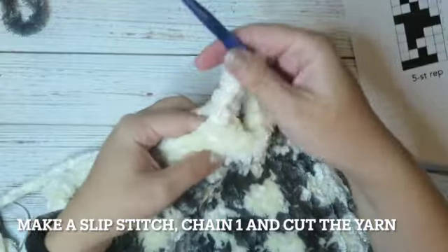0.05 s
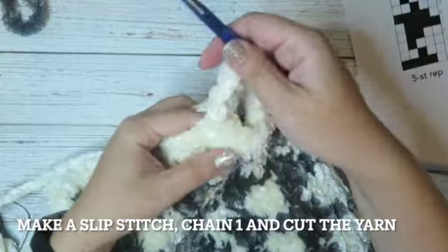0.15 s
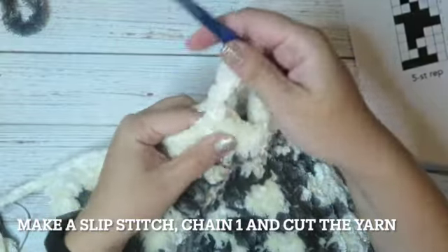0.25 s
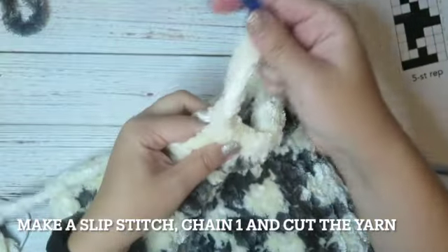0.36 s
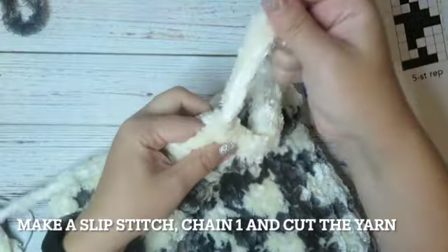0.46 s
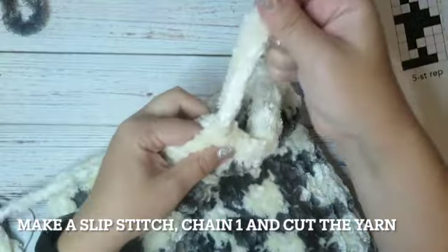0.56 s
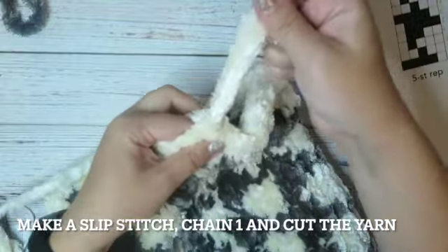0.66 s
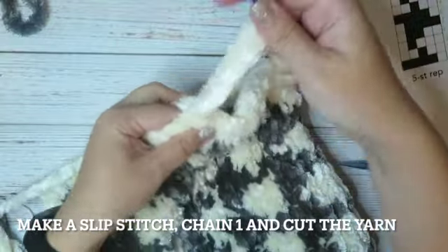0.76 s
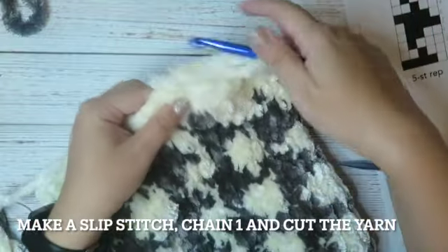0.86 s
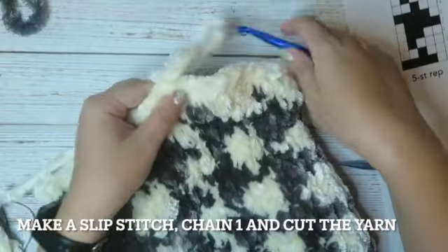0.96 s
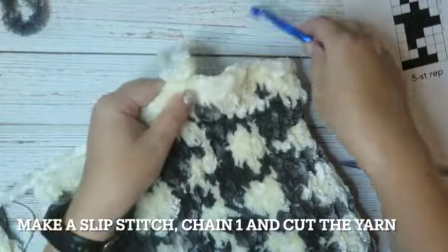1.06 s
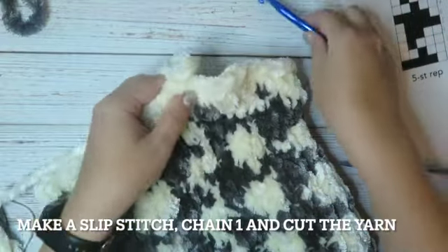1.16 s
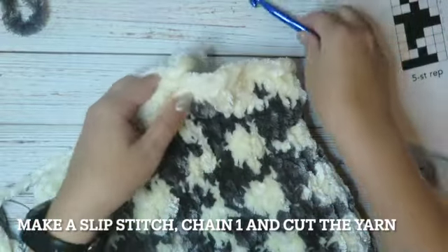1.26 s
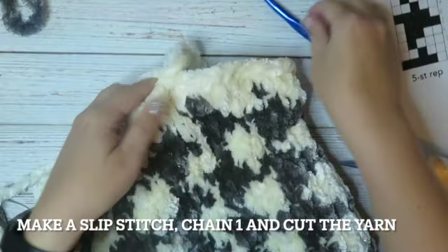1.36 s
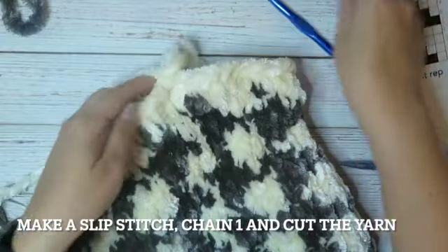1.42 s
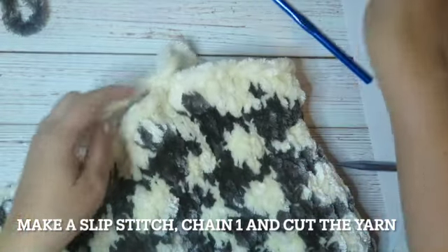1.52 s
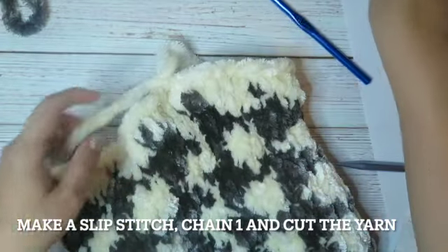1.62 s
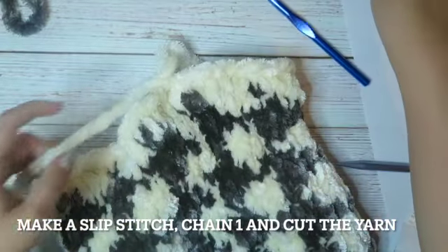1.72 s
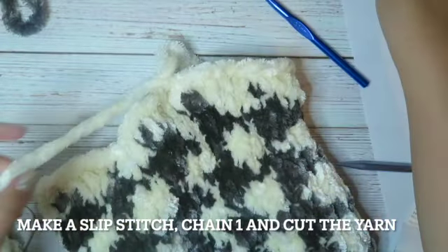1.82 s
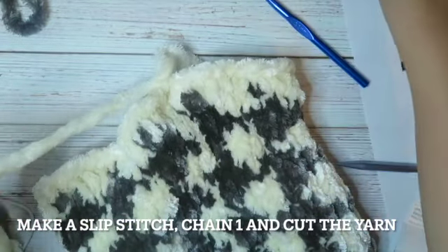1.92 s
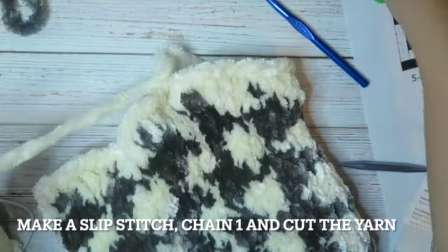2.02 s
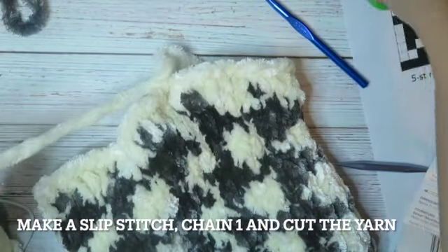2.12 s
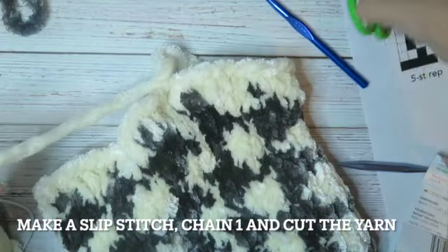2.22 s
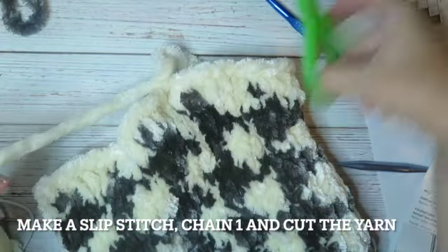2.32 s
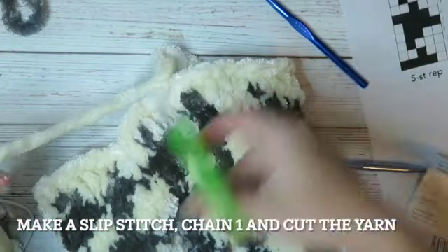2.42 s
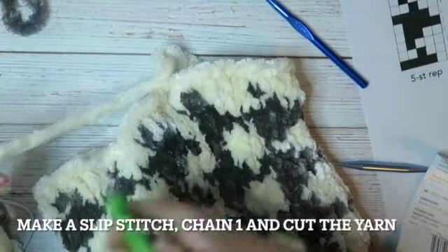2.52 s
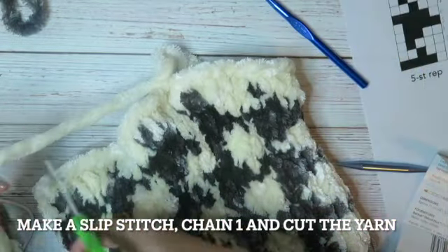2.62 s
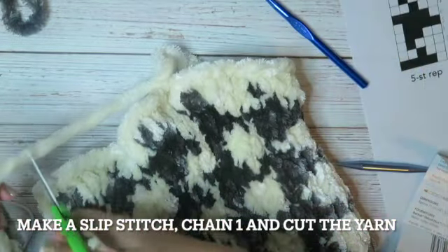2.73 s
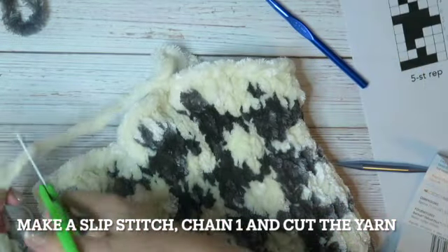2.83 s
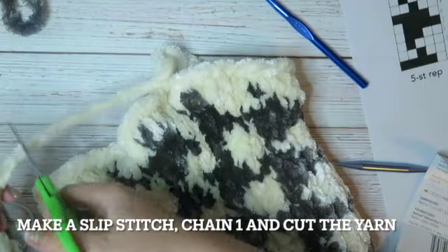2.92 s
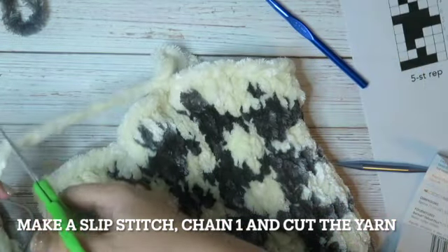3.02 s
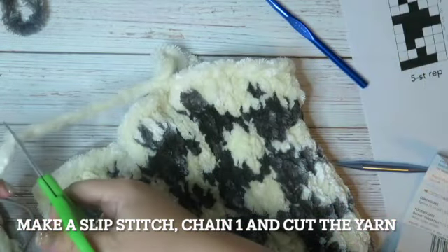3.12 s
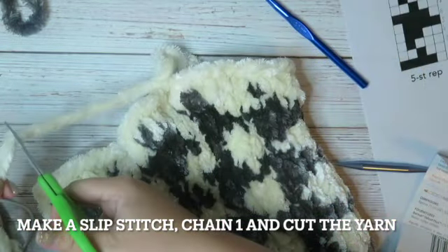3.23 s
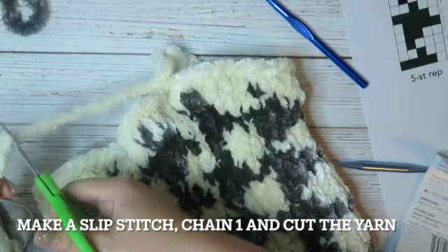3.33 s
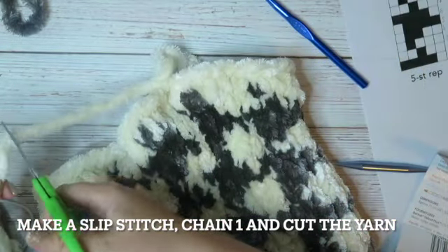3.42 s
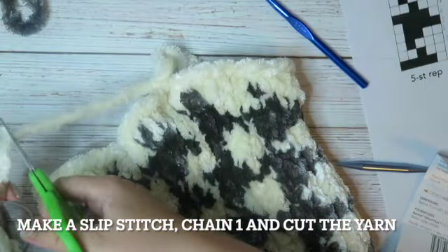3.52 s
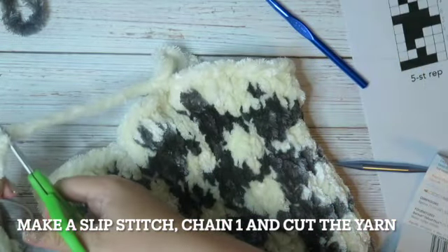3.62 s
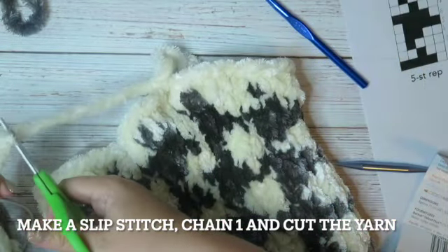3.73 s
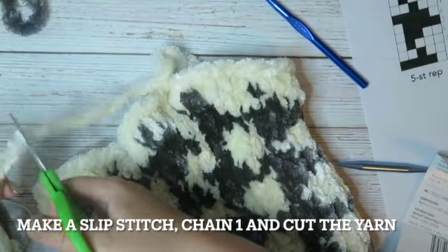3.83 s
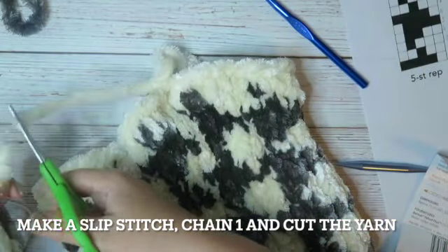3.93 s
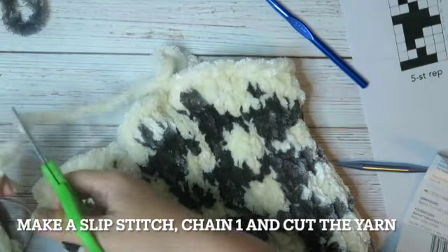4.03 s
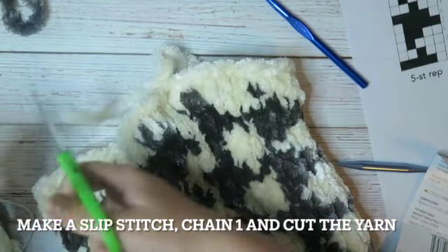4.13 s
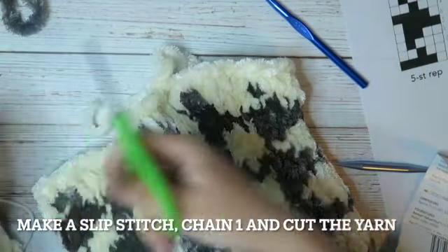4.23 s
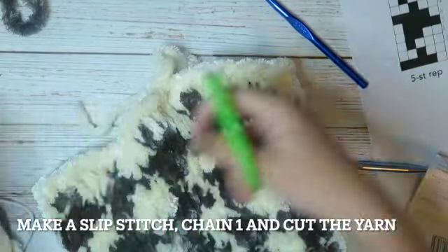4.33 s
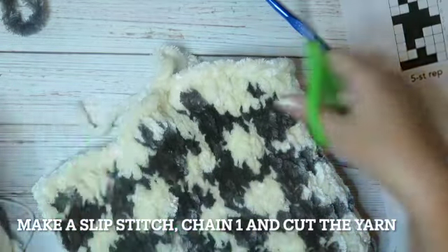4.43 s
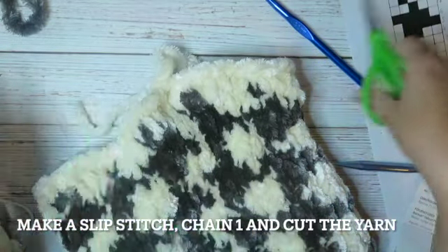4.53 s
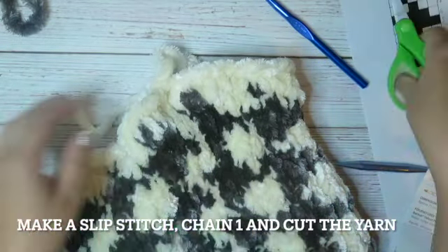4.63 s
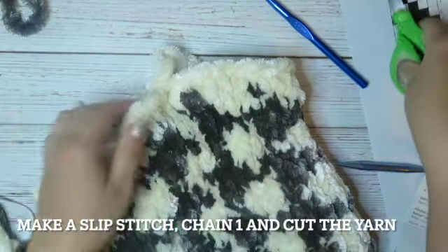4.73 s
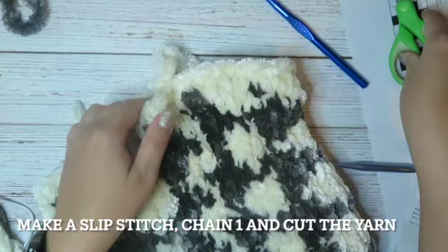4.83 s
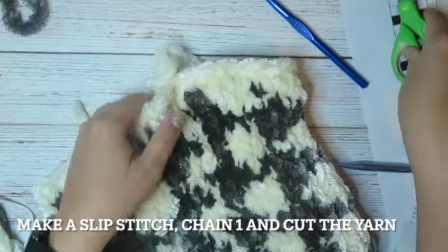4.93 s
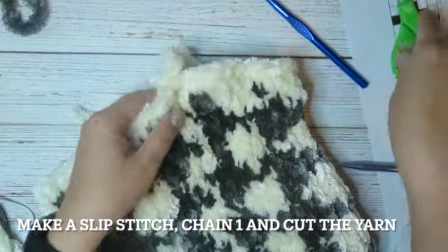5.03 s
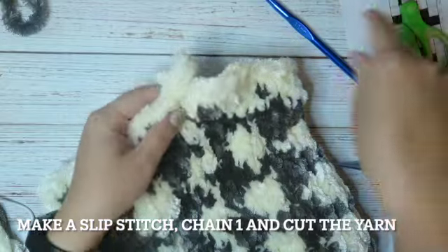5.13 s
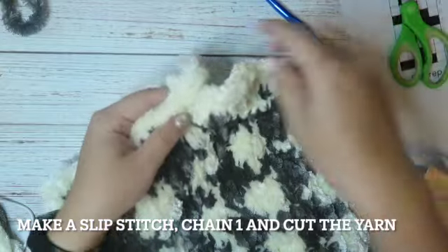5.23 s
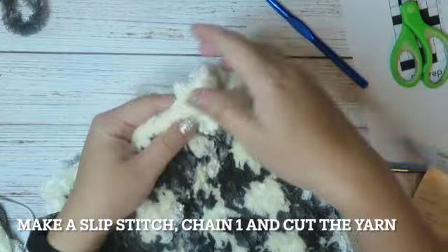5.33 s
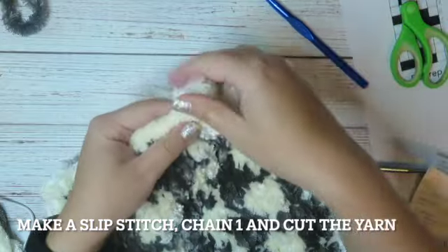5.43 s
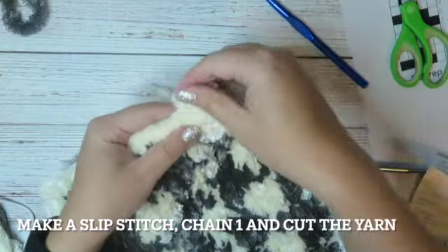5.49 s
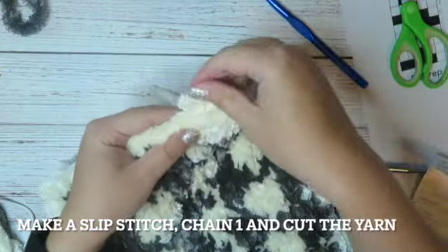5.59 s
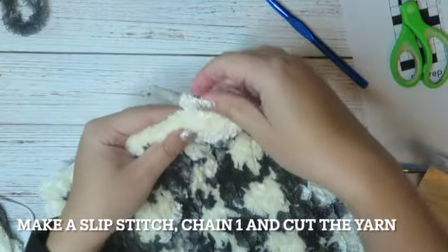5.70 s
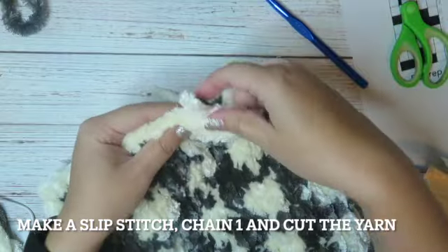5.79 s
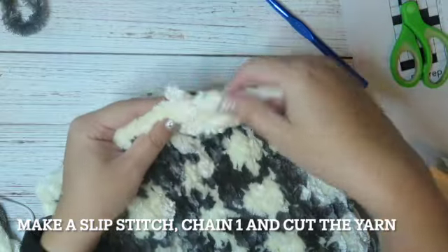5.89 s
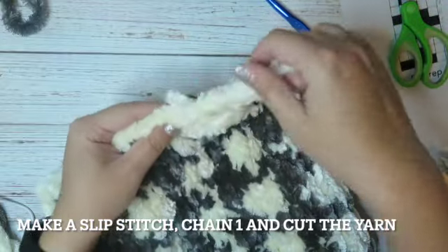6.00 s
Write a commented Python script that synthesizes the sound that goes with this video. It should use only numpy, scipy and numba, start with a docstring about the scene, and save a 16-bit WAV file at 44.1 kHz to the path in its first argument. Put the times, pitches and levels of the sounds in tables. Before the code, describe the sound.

Close stereo sound in a quiet, faintly hissing room. After a soft scuff, a crochet hook knocks down on a wooden table in a quick cluster, with scratchy sliding over paper and wool. A very sharp click ends the handling as scissors are picked up. Bright scraping snips through thick yarn follow slightly left, with crisp blade ticks. Finally the scissors drop on the right with two hard knocks and a brief rattle, then near silence.

```python
"""After a soft scuff, a crochet hook is laid on a wooden table and scissors are picked up: knocks ring the
modes of the table top, hard ticks edge the contacts, and noise of tiny catches slides over paper and wool.
Then the scissors snip thick yarn, with sharp blade ticks over swells of scraping noise.
At last they are dropped with hard knocks and a short rattle. A quiet room hisses throughout."""
import sys
import numpy as np
from scipy import signal
from scipy.fft import rfft, irfft, next_fast_len
from scipy.io import wavfile
from scipy.ndimage import uniform_filter1d
from numba import njit

SR = 44100
rng = np.random.default_rng(int(sys.argv[2]) if len(sys.argv) > 2 else 0)


def master_out(mix):
    """Clip the mix to full scale and print it as 16-bit PCM to the path in sys.argv[1]."""
    frames = np.transpose(np.atleast_2d(mix))
    ceiling = np.clip(frames, -1, 1)
    pcm = np.round(ceiling * 32767).astype(np.int16)
    wavfile.write(sys.argv[1], SR, pcm)


N = 267092

# Room hiss and far rumble. Each row: frequency in Hz, relative level in dB per Hz.
AIR_SPECTRUM = [(12, -41), (20, -10.5), (60, -0.5), (165, -8.5), (195, -8), (297, -11.5), (332, -11),
                (372, -11.5), (709, -13.5), (794, -13.5), (994, -14), (1320, -14.5), (3520, -17.5),
                (15200, -29), (16500, -44)]
# Stereo width of the air. Each row: frequency in Hz, side minus mid in dB.
AIR_SIDE_SPECTRUM = [(60, -12), (110, -1.5), (200, 7), (380, 8), (700, 4.5), (1290, -1.5), (2380, -5.5),
                     (4400, -6.5), (8120, -2.5), (15000, 0.5)]
# Scuffs of hand and tools on paper and wool. Each row: start of full level in seconds, level in dB,
# rise in ms per 20 dB, hold in ms, centre in octaves above 1 kHz, shaking of the table in dB.
SCUFFS = [(.38, -55, 60, 120, 2.9, -56), (1.309, -42, 18, 49, 1.3, -56), (1.41, -44.5, 16, 25, 2.6, -29.5),
          (1.63, -38, 26, 32, 2, -29.5), (1.752, -41.5, 37, 24, 1.5, -46.5),
          (1.845, -39.5, 38, 31, 0.74, -40.5), (1.931, -34, 5, 50, 1.83, -32.5),
          (2.04, -44, 42, 51, 2.2, -51), (2.115, -38, 25, 22, 3.1, -39.5),
          (2.178, -37, 27, 21, 1.44, -39.5), (2.289, -39.5, 8, 5, .9, -41), (2.39, -50, 24, 30, 3.8, -44),
          (2.515, -42.5, 12, 12, 3.9, -52), (2.565, -55, 17, 16, 2.7, -50),
          (4.85, -50.5, 45, 17, 1.15, -70), (4.925, -40.5, 85, 68, 1.1, -65)]
# The dropped scissors rattle to rest. Each row: start of full level in seconds, level in dB,
# rise in ms per 20 dB, hold in ms.
RATTLE_SWELLS = [(5.11, -17.5, 5, 9.5), (5.135, -41, 13, 26)]
# Tone of the rattle. Each row: frequency in Hz, relative level in dB per Hz.
RATTLE_SPECTRUM = [(290, -54), (500, -11.5), (1400, -4), (2160, -6), (2430, -1), (2610, -10), (5310, -15),
                   (9630, -28), (11800, -23.5), (16000, -29)]
# Modes of the table top. Each row: frequency in Hz, level in dB, T60 in seconds.
TABLE_MODES = [(61.7, 0.5, 0.23), (90, -4, 0.093), (134.3, -10, 0.21), (145, -2.5, 0.2), (194.5, -10, 0.2),
               (248, -11, 0.026), (276.5, 2.5, 0.031), (317, -1.5, 0.065), (330, -8, 0.078),
               (379, -11.5, 0.1), (430, -6.5, 0.18), (446, -23, 0.069), (565.4, -7.5, 0.081),
               (667, -14, 0.083), (780, -5.5, 0.035), (851, -16.5, 0.12), (960, -8, 0.037),
               (1090, -10, 0.019), (1375, -15, 0.043), (1750, -17, 0.036), (2070, -25, 0.099),
               (2537, -16, 0.04)]
# Blows on the table. Each row: start in seconds, strength in dB, contact time in ms (at most 4 is used),
# tilt over the modes in dB per octave.
TABLE_BLOWS = [(0.931, -47.5, 0.62, 3), (1.3075, -14.5, 1.4, 6.5), (1.316, -24, 0.97, 2),
               (1.342, -29.5, 1.14, 1.5), (1.3991, -25.5, 0.67, 0), (1.4096, -8, 0.77, 2.5),
               (1.4145, -14, 0.48, 2.5), (1.428, -21, 0.38, 2.5), (1.4555, -24, 1.1, 4.5),
               (1.466, -25.5, 0.57, -3), (1.551, -37, 2.3, -1), (1.607, -34, 1.4, -5.5),
               (1.6332, -17.5, 0.53, 1), (1.643, -22, 0.34, 1), (1.7703, -21.5, 1.6, 1),
               (1.849, -28, 4.3, -1), (1.926, -33, 0.81, -2), (1.975, -36.5, 2.5, -8.5),
               (2.14, -31, 1.8, -4), (2.155, -29, 0.57, 7), (2.1608, -26.5, 1.8, -1.5),
               (2.2865, -37.5, 0.21, 5), (2.3619, -27, 0.52, 5), (2.368, -24, 1.9, -2.5),
               (4.9771, -10.5, 1.32, 2), (5.0977, -11, 1.94, 5.5), (5.124, -16.5, 2.4, 1),
               (6.03, -47.5, 1.9, -5)]
# Blade strokes through yarn. Each row: start of full level in seconds, level in dB,
# rise in ms per 20 dB, hold in ms.
BLADE_STROKES = [(3.10, -40, 55, 42), (3.314, -34.5, 15, 8), (3.634, -33, 53, 23), (3.955, -35, 34, 28),
                 (4.293, -34, 22, 6)]
# Modes of scissor steel and plastic. Each row: frequency in Hz, width in Hz, level in dB.
SCISSOR_MODES = [(710, 150, 11.5), (2330, 690, 1), (3060, 2000, -5.5), (4320, 880, 5.5), (4850, 1130, -5.5),
                 (6100, 1400, -20), (11250, 2550, 4), (12500, 1100, -31)]
# Hard ticks of hook, handles and blades. Each row: start in seconds, peak level in dB before panning,
# band centre in octaves above 1 kHz (kept within 500 to 14000 Hz), decay time constant in ms.
HARD_TICKS = [(1.305, -15, 3., 1.2), (1.352, -32, 5, .8), (1.397, -25, 2, .8), (1.4092, -17.5, 2.6, 0.74),
              (1.414, -18, 2.5, .9), (1.640, -21, 1.5, 1.1), (1.660, -20, 6, .8), (1.93, -24, 5, 1.1),
              (2.002, -17.5, 3.4, 2.1), (2.1545, -20, 1., 0.87), (2.191, -26, 6, 1.5),
              (2.2848, -22, 5, 1.3), (2.3602, 1, 2, 0.94), (2.3619, -5.5, -.5, 0.72), (2.368, -21, 5, 1.),
              (2.514, -22.5, 5, 1.7), (3.3154, -7.5, 2, 0.34), (3.4948, -22, 3, 0.4), (3.619, -33, 0.5, .6),
              (3.6542, -23, 3.5, .8), (3.8377, -26.5, 2, 1.5), (3.9746, -9, 2.5, 0.47),
              (4.13, -26.5, 4, 0.95), (4.2949, -8.5, 2, 0.21), (4.976, -10, 3, 0.85), (4.984, -28, 3.3, .6),
              (4.993, -23, 3., .7), (5.108, -30, 6, .9), (5.1128, -9, -0.1, 1.), (5.118, -11, 1, 1.)]
# Early echoes of a tick off table and phone stand. Each row: delay in ms, level in dB.
TICK_ECHOES = [(2.1, -12), (3.6, -16), (7.0, -15), (10.5, -19)]

AIR_DB = -47.5  # level of the mid part
ROOM_DB, ROOM_T60_S = -16, 0.11
SLIDE_FALL_MS, SHAKE_RISE_MS, SHAKE_FALL_MS = 44, 40, 100  # per 20 dB
RATTLE_FALL_MS = 41  # per 20 dB
RADIATE_HZ = 104.5  # below this the table top barely moves the air
SHEAR_OCTAVES, SHEAR_FALL_MS = 3.3, 34  # centre above 1 kHz; fall per 20 dB
BUZZ_DB, BUZZ_MS = -25, 12  # loose parts buzz on; level and decay time constant
# the tools lie on the right; the scissors work at the yarn on the left between these times
YARN_START_S, YARN_END_S = 2.6, 4.4
YARN_PAN_DB, DESK_PAN_DB = 4, -3  # left minus right
YARN_THIN_HZ = 1480  # held in the air, the blades give little below this
TOP_HZ = 15900  # top edge of the phone's range


def undb(db):
    """Turn decibels into an amplitude factor."""
    return 10 ** (np.asarray(db) / 20)


def unit(x):
    """Scale to an RMS level of one."""
    return x / np.sqrt(np.mean(x ** 2))


def colour(x, *spectra):
    """Shape by (Hz, dB) points, straight on a log-frequency axis."""
    size = next_fast_len(N)
    log_hz = np.log(np.maximum(np.fft.rfftfreq(size, 1 / SR), 1))
    db = 0
    for spectrum in spectra:
        point_hz, point_db = np.transpose(spectrum)
        db = db + np.interp(log_hz, np.log(point_hz), point_db)
    return irfft(rfft(x, size) * undb(db), size)[:N]


def add(out, start_s, sound):
    """Mix a sound in at its start time, cut at the end of the scene."""
    i = int(start_s * SR)
    out[..., i:i + sound.shape[-1]] += sound[..., :N - i]


def high_pass(x, hz):
    """Thin the sound below hz with a third-order slope."""
    return signal.sosfilt(signal.butter(3, hz, "high", fs=SR, output="sos"), x)


@njit
def svf(x, hz, damp):
    """Band-pass with a moving centre; damp = width / centre."""
    y, b, l = np.empty(len(x)), 0., 0.  # b and l are the band and low states
    for i in range(len(x)):
        g = np.tan(np.pi * hz[i] / SR)
        v = (b + g * (x[i] - l)) / (1 + g * (g + damp))
        b, l, y[i] = 2 * v - b, l + 2 * g * v, damp * v
    return y


def band(x, octaves, damp):
    """A broad band with steep skirts, from two band-passes in a row."""
    hz = np.clip(1000 * 2 ** (octaves + np.zeros(len(x))), 500, 14000)
    return svf(svf(x, hz, damp), hz, damp)


def grit(spread_db, patchy_db):
    """Noise of tiny catches of uneven size, coming in patches of a few milliseconds."""
    patches = np.repeat(rng.standard_normal(N // 150 + 1), 150)[:N]
    patches = uniform_filter1d(patches, size=100)
    catch_sizes = np.minimum(rng.exponential(size=N), 4)
    return unit(rng.standard_normal(N) * undb(spread_db * catch_sizes + patchy_db * patches))


def wide(make, like):
    """Two channels with correlation like, from two independent makings of a sound."""
    like = np.clip(like, -1, 1)
    mid = np.sqrt(1 + like) * make()
    side = np.sqrt(1 - like) * make()
    return unit(np.array([mid + side, mid - side]))


def swells(start_s, db, rise_ms, hold_ms, fall_ms):
    """Gain of each stroke over time: rise, hold, fall, all straight in dB."""
    start_s, db, rise_ms, hold_ms = (np.reshape(v, (-1, 1)) for v in (start_s, db, rise_ms, hold_ms))
    ms = 1000 * (np.arange(N) / SR - start_s)
    before = -ms / np.maximum(rise_ms, 1)
    after = (ms - hold_ms) / fall_ms
    return undb(db - 20 * np.maximum(0, np.maximum(before, after)))


def scissor_body(x):
    """The scissors ring briefly in a few broad modes of alternating sign."""
    ring = np.zeros(len(x))
    for k, (hz, width, db) in enumerate(SCISSOR_MODES):
        ring += (-1) ** k * undb(db) * svf(x, np.full(len(x), 1. * hz), width / hz)
    return ring


def rub(gain, octaves, spread_db, patchy_db, damp, like, ring):
    """Dense catches, coloured by a broad band, which may move, and partly by the scissors."""
    def catches():
        x = grit(spread_db, patchy_db)
        return band(x + ring * scissor_body(x), octaves, damp)
    return gain * wide(catches, like)


def air():
    """Room hiss and far rumble; its low middle is mostly opposite on the two ports."""
    mid = colour(rng.standard_normal(N), AIR_SPECTRUM)
    side = colour(rng.standard_normal(N), AIR_SPECTRUM, AIR_SIDE_SPECTRUM)
    return undb(AIR_DB) / np.std(mid) * np.array([mid + side, mid - side])


def room(source):
    """The room answers with a short diffuse tail: dulled noise that swells in and dies away."""
    t = np.arange(int(0.3 * SR)) / SR
    envelope = 1000 ** (-t / ROOM_T60_S) * (1 - np.exp(-t / 0.015))
    tail = rng.standard_normal((2, len(t))) * envelope
    tail = signal.sosfilt(signal.butter(1, 9000, fs=SR, output="sos"), tail)
    tail /= np.sqrt(np.sum(tail[0] ** 2))
    return undb(ROOM_DB) * signal.fftconvolve(source, tail, axes=1)[:, :N]


def slide():
    """Scuffs on paper and wool are dense catches; the loudest scuff sets the colour."""
    start_s, db, rise_ms, hold_ms, octaves, _ = np.transpose(SCUFFS)
    gains = swells(start_s, db, rise_ms, hold_ms, SLIDE_FALL_MS)
    centre = uniform_filter1d(octaves[gains.argmax(axis=0)], size=400)
    return rub(gains.sum(axis=0), centre, spread_db=1.5, patchy_db=2.8, damp=3.57, like=0.11, ring=0.11)


def rattle():
    """Quick bounces of the loose blades and handles, as coloured grit in short swells."""
    gain = swells(*np.transpose(RATTLE_SWELLS), RATTLE_FALL_MS).sum(axis=0)
    return gain * wide(lambda: colour(grit(2.8, 3.1), RATTLE_SPECTRUM), 0.42)


def table():
    """Each blow is a short push into the modes of the table top; dragging feeds them with noise."""
    hz, db, t60 = np.transpose(TABLE_MODES)[:, :, None]
    t = np.arange(int(0.35 * SR)) / SR
    decay = undb(db) * 1000 ** (-t / t60)
    out = np.zeros((2, N))
    variations = rng.standard_normal((len(TABLE_BLOWS), 3, len(TABLE_MODES), 1))
    for (start_s, blow_db, ms, tilt_db), (spot, detune, aim) in zip(TABLE_BLOWS, variations):
        # quick rise, slower release
        push = t[:400] * np.exp(-4000 * t[:400] / np.clip(ms, 0.1, 4))
        # every blow weights and tunes the modes a little differently, by chance
        weight = undb(3.2 * spot + tilt_db * np.log2(hz / 300))
        modes = decay * np.sin(2 * np.pi * hz * (1 + 0.024 * detune) * t) * weight
        mid = modes.sum(axis=0)
        side = (modes * (0.073 + aim * hz / 4000)).sum(axis=0)  # high modes beam unevenly
        knock = signal.fftconvolve([mid + side, mid - side], [push / push.sum()], axes=1)
        add(out, start_s, undb(blow_db) * knock)
    # under dragging, the modes die away faster
    damped = (decay * np.sin(2 * np.pi * hz * t) * 1000 ** (-t / 0.23)).sum(axis=0)
    shake = unit(signal.fftconvolve(grit(1.9, 2.8), damped)[:N])
    start_s, _, _, hold_ms, _, shake_db = np.transpose(SCUFFS)
    out += shake * swells(start_s, shake_db, SHAKE_RISE_MS, hold_ms, SHAKE_FALL_MS).sum(axis=0)
    return high_pass(out, RADIATE_HZ)


def shear():
    """The blades scrape through the yarn in swells of bright, dense catches."""
    gain = swells(*np.transpose(BLADE_STROKES), SHEAR_FALL_MS).sum(axis=0)
    return rub(gain, SHEAR_OCTAVES, spread_db=1.8, patchy_db=3.0, damp=4.4, like=0.27, ring=0.17)


def ticks():
    """A sharp edge and a short burst, part through the scissors' modes, then echoes."""
    out = np.zeros((2, N))
    t = np.arange(int(0.033 * SR)) / SR
    buzz = undb(BUZZ_DB) * np.exp(-1000 * t / BUZZ_MS)
    noises = rng.standard_normal((len(HARD_TICKS), 2, len(t)))
    for (start_s, db, octaves, ms), (mid, side) in zip(HARD_TICKS, noises):
        at_yarn = YARN_START_S < start_s < YARN_END_S
        pan_db = YARN_PAN_DB if at_yarn else DESK_PAN_DB
        envelope = np.exp(-1000 * t / max(ms, 0.05)) + buzz
        burst = np.array([mid + 0.58 * side, mid - 0.58 * side]) * envelope
        burst[:, 0] += 4  # the sharp edge
        tick = np.array([band(0.5 * b + scissor_body(b), octaves, 2.4) for b in burst])
        if at_yarn:
            tick = high_pass(tick, YARN_THIN_HZ)
        far = int(pan_db > 0)
        tick[far] = np.roll(tick[far], 2)  # the far port hears it two samples later
        port_db = db + np.array([[pan_db], [-pan_db]]) / 2
        add(out, start_s, tick / np.abs(tick).max() * undb(port_db))
    echoes = np.zeros_like(out)
    for ms, db in TICK_ECHOES:
        add(echoes, ms / 1000, undb(db) * out[::-1])  # echoes swap sides
    return out + echoes


def scene():
    """Hand and tool sounds and the ringing table, with their room tail, over the quiet air."""
    airborne = slide() + rattle() + shear() + ticks()
    wood = table()
    return air() + room(airborne + 0.5 * wood) + wood + airborne


def record(dry):
    """The phone drops the deepest bass, dulls the top, clips, and cuts the top off."""
    x = signal.sosfilt(signal.butter(1, 30, "high", fs=SR, output="sos"), dry)
    x = signal.sosfilt(signal.butter(2, 13500, fs=SR, output="sos"), x)
    x = np.clip(x, -1, 1)
    return signal.sosfilt(signal.ellip(10, 0.2, 90, TOP_HZ, fs=SR, output="sos"), x)


dry = scene()
out = record(dry)
master_out(out)
```